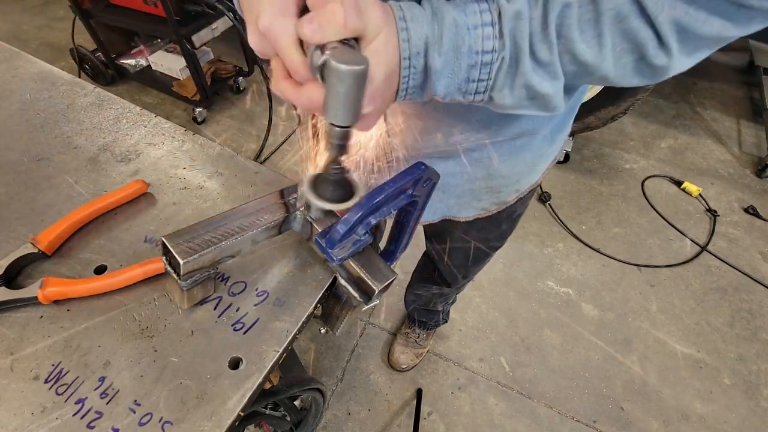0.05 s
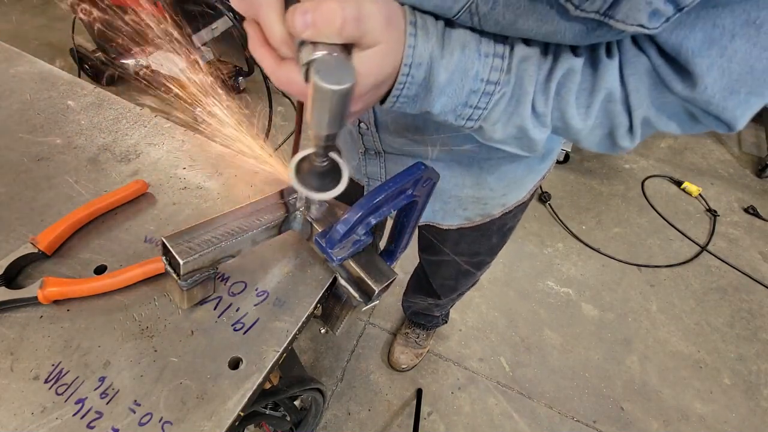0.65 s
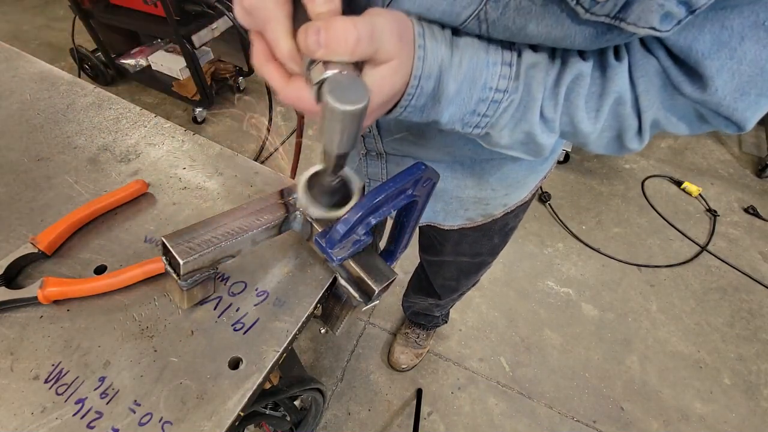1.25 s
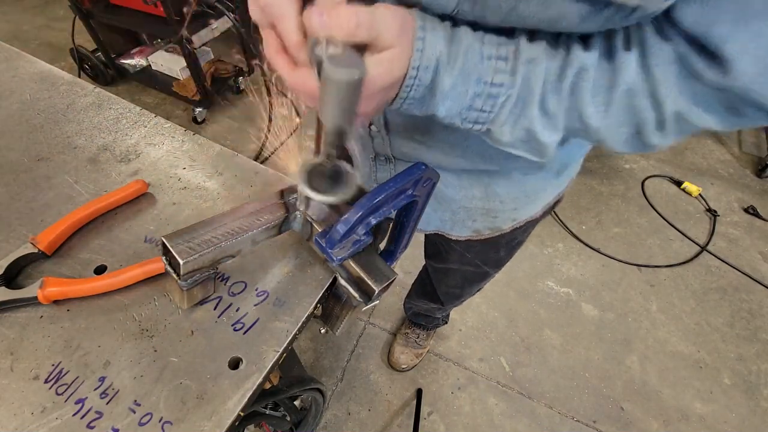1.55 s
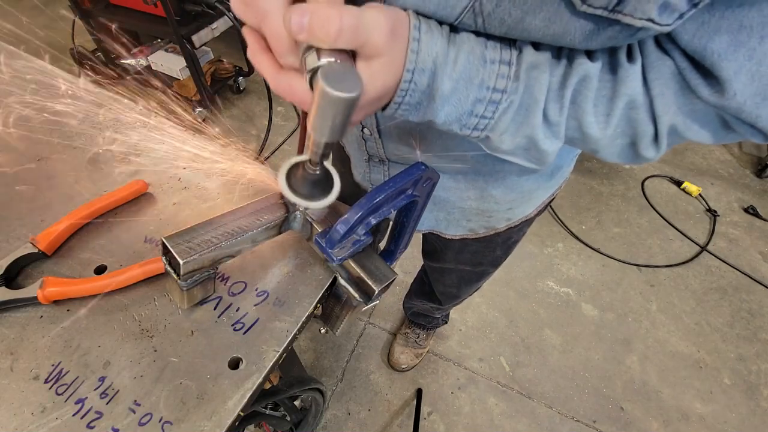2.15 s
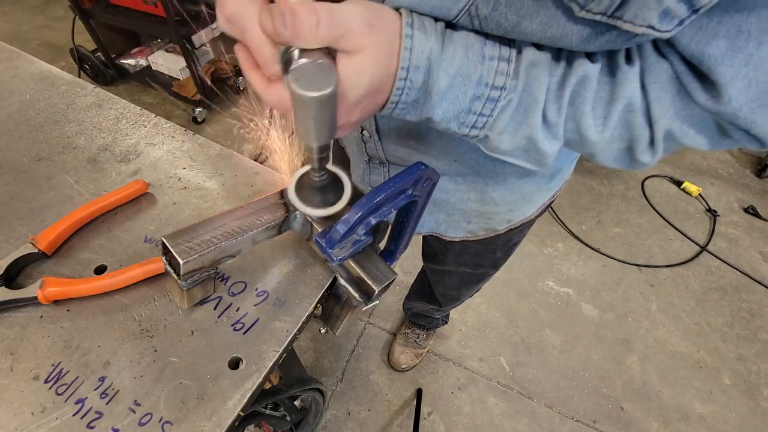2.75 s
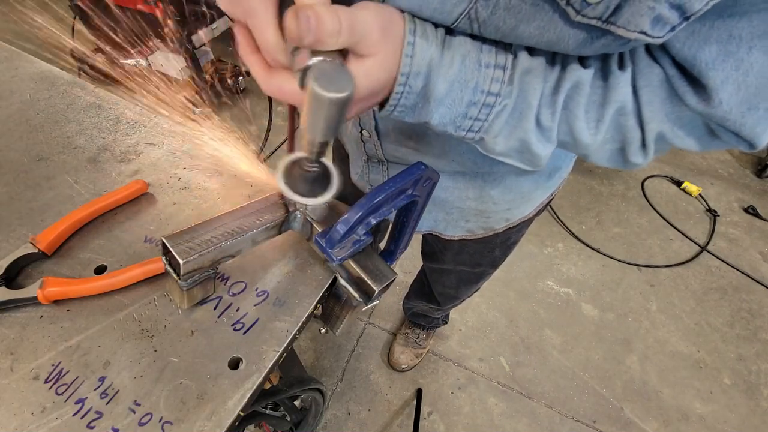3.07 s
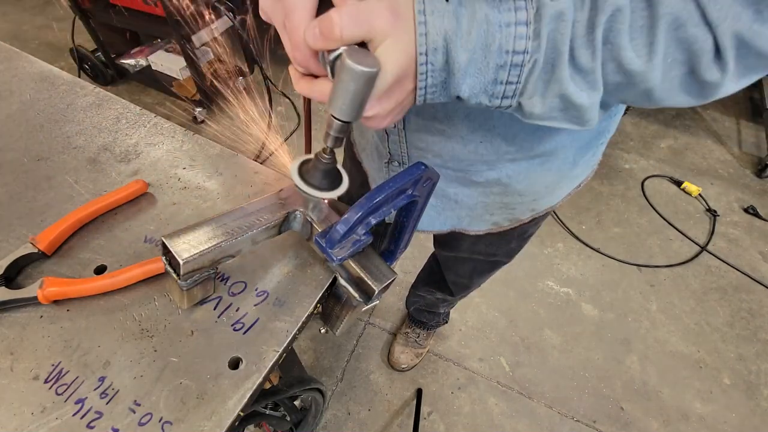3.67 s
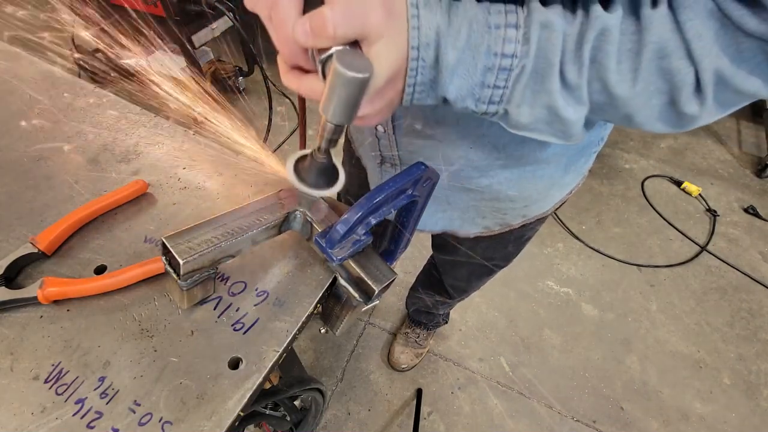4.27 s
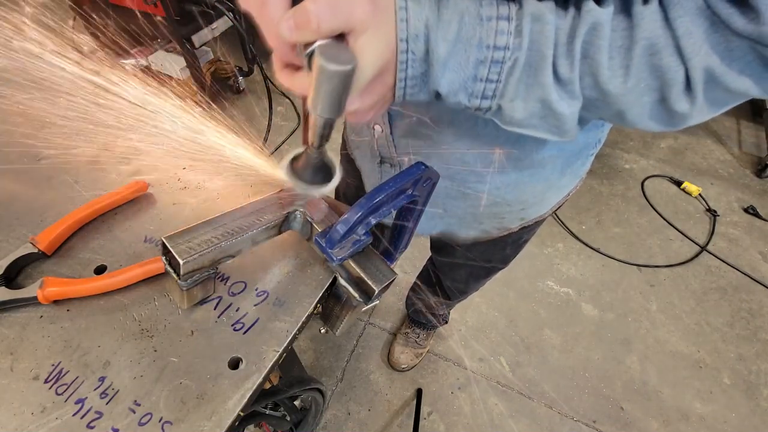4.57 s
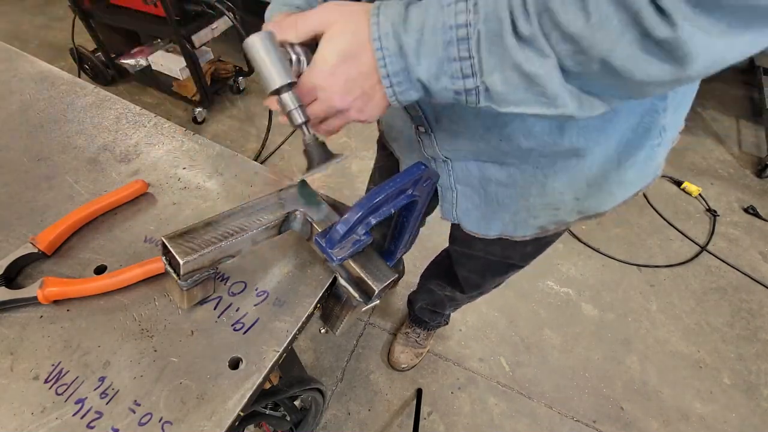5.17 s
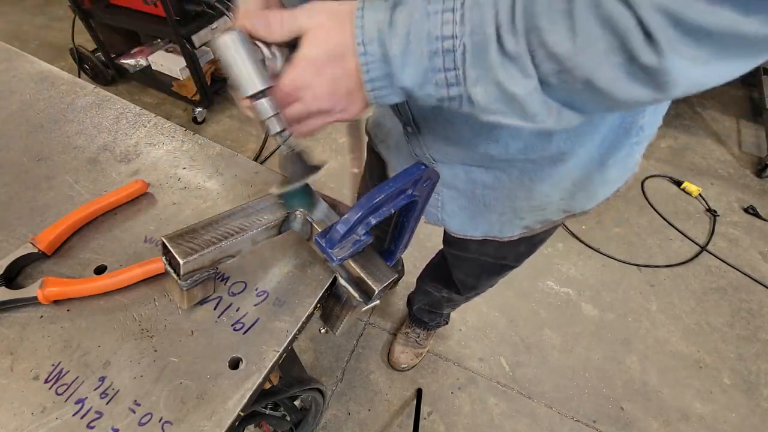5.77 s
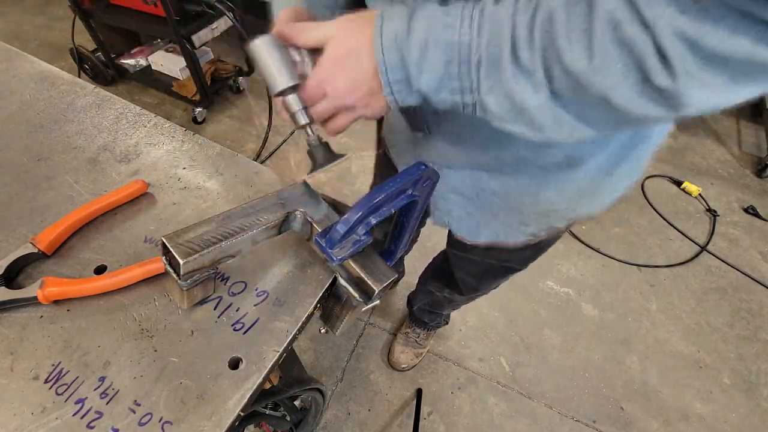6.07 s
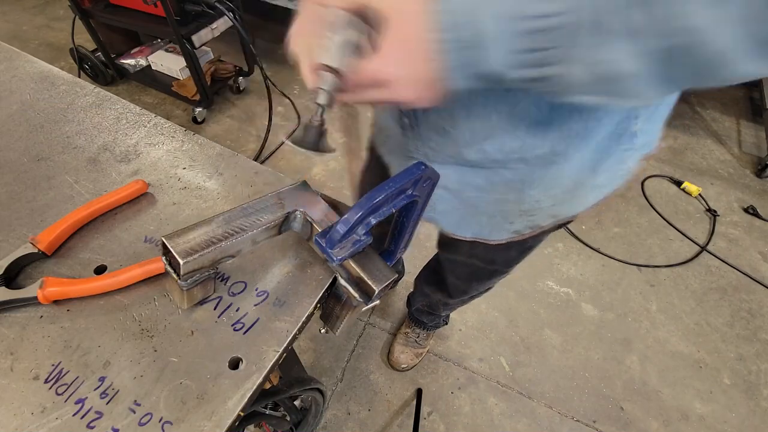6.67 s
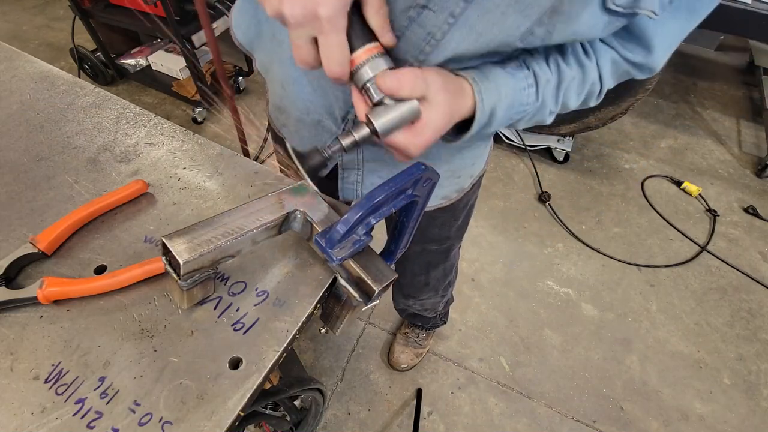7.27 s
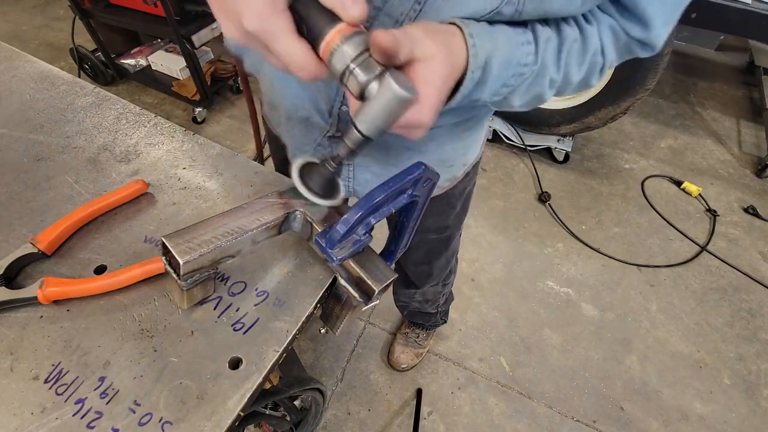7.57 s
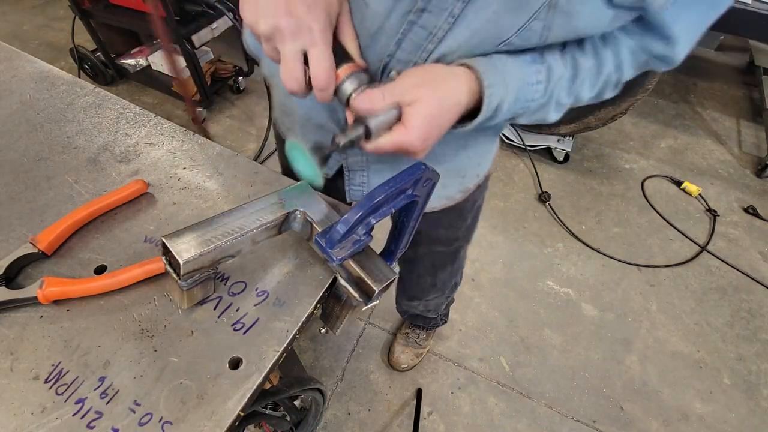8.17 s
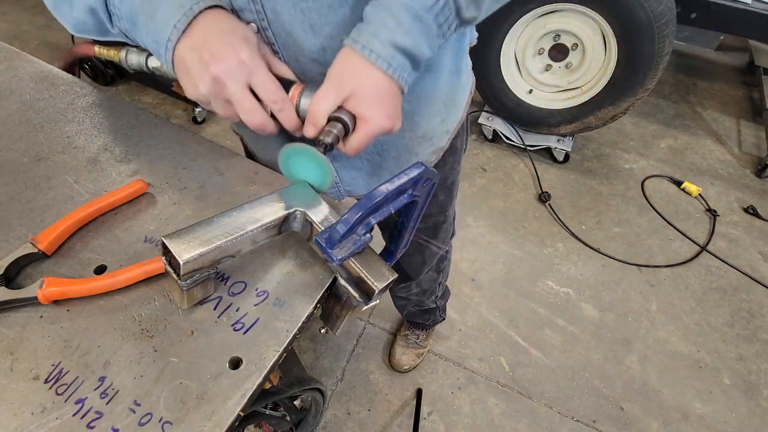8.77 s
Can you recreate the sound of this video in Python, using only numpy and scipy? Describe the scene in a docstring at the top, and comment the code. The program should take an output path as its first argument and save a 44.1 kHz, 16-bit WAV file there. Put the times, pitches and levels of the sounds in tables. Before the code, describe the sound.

An air die grinder works a welded steel tube at arm's length in a dry workshop. Bright exhaust hiss and gritty, ringing abrasion cover a wavering motor whine that sags under load and races when free. It runs from the start, with very brief breaks at about 0.2, 1.7 and 3.5 seconds, cutting back in at 3.6 with a sharp burst of hiss. The note flutters as the disc bounces, and thin high squeals come and go. After another break at 5 seconds, the pitch swings more erratically, the whine swelling near 5.6. The tool stops at about 6.7 seconds, leaving a few light clicks over a faint low room drone. It restarts at 7, breaks briefly near 7.8 and races higher until 8.2. A faint tick or two follows, then grinding resumes from about 8.5 seconds to the end, just past 9.

```python
"""A hiss of exhaust air and a wavering whine: an air die grinder dresses the weld on a steel tube in a
dry workshop, an arm's length from a phone's two microphones. The vane motor sings at four times its
shaft rate, racing when free and sagging when the disc bites. Air hisses with every pull of the trigger,
grit rings the tube, and the tool clicks lightly in the hands in the later pauses."""
import sys
import numpy as np
from scipy import signal
from scipy.fft import rfft, irfft, next_fast_len
from scipy.io import wavfile
from scipy.ndimage import uniform_filter1d

SR = 44100
rng = np.random.default_rng(int(sys.argv[2]) if len(sys.argv) > 2 else 0)


def transcribe(signal):
    """Save signal, clipped to [-1, 1], as a 16-bit WAV file at the path in sys.argv[1]."""
    frames = np.atleast_2d(signal).T
    limited = np.clip(frames, -1, 1)
    pcm = np.round(limited * 32767).astype(np.int16)
    wavfile.write(sys.argv[1], SR, pcm)


N = 398223
T = np.arange(N) / SR


def undb(db):
    """Decibels to gain."""
    return 10 ** (np.asarray(db) / 20)


def unit(x):
    """Scale to rms 1."""
    return x / np.sqrt(np.mean(x ** 2))


def curves(table):
    """The columns of a table, joined by straight lines in time."""
    s, *columns = np.transpose(table)
    return [np.interp(T, s, c) for c in columns]


def shape(x, response):
    """Filter by a response given as a function of frequency."""
    size = next_fast_len(N + 4096, True)
    freq = np.maximum(np.arange(size // 2 + 1) * SR / size, 1)
    return irfft(rfft(x, size) * response(freq), size)[..., :N]


def colour(x, hz, db):
    """Filter by a spectrum of a few points."""
    return shape(x, lambda f: undb(np.interp(np.log(f), np.log(hz), db)))


def resonance(f, hz, width):
    """Response of one mode, gain 1 at its centre."""
    return 1 / (1 + 1j * (f / hz - hz / f) * hz / width)


def walk(rate, t=T):
    """A random curve with `rate` knots a second and a spread near 1."""
    knots = rng.standard_normal(16384)
    return 1.2 * np.interp(t * rate, np.arange(len(knots)), knots)


def phase(hz):
    """Phase in radians of a moving frequency."""
    return 2 * np.pi * np.cumsum(hz) / SR


def since(s):
    """Seconds elapsed since a moment, zero before it."""
    return np.maximum(T - s, 0)


def window(start, end, fade):
    """A stretch of time: its samples, their times, and a gain ramped at both ends."""
    span = slice(int(max(start, 0) * SR), int(max(end, start + fade) * SR))
    return span, T[span], np.clip(np.minimum(T[span] - start, end - T[span]) / fade, 0, 1)


def mics(x, lag_samples=7):
    """Direct sound reaches the left microphone first."""
    return np.array([x, np.pad(x, (lag_samples, 0))[:N]])


def reflections(x, t60, delay):
    """A short diffuse tail, different at each microphone."""
    t = T[:SR // 2]
    tail = rng.standard_normal((2, len(t))) * undb(-60 * t / t60) * (t > delay)
    tail /= np.sqrt(np.sum(tail ** 2, axis=1, keepdims=True))
    return signal.fftconvolve(np.atleast_2d(x), tail, axes=1)[:, :N]


KICK_SHARE = .55  # the rotor starts this far into the rise of the air
LOADED_HZ, LOOSE_HZ = 170, 135.56  # the shaft races above the first; vanes rattle below the second
# shaft speed as the disc bites and frees, one curve a run: t/s, f/Hz
SHAFT_SPEEDS = [
    [(0, 196.4), (.04, 157.9), (.1, 215), (.17, 176.5), (.21, 280)],
    [(.35, 254), (.43, 138.1), (.56, 130.3), (.6, 186.4), (.67, 188), (.75, 140.8), (.89, 174), (1, 143.6),
     (1.13, 179.4), (1.21, 134.5), (1.39, 176.7), (1.6, 151.3), (1.63, 280)],
    [(1.85, 290), (1.95, 168.9), (2.55, 165.6), (2.7, 136.5), (2.92, 166.4), (3.03, 150.4), (3.12, 164.5),
     (3.18, 237.6), (3.24, 186.3), (3.37, 159.3), (3.44, 188.5), (3.465, 259)],
    [(3.58, 318), (3.63, 213), (3.71, 168.5), (3.78, 194.7), (3.865, 144.2), (3.9, 259.5), (4.04, 213.7),
     (4.3, 178.2), (4.6, 174), (4.71, 193.5), (4.84, 156), (5.01, 240.7)],
    [(5.19, 195), (5.32, 226.3), (5.38, 165), (5.54, 235.2), (5.63, 258), (5.69, 166), (5.735, 128),
     (5.78, 163.3), (5.84, 128.5), (5.88, 64), (5.94, 95.6), (5.98, 195), (6.03, 145.5), (6.13, 214.3)],
    [(6.23, 194), (6.27, 80), (6.305, 290), (6.345, 181.6), (6.39, 285), (6.425, 125), (6.47, 273.3),
     (6.51, 170.8), (6.56, 212), (6.68, 143.1)],
    [(7.05, 230), (7.12, 295), (7.17, 171.7), (7.21, 147.8), (7.235, 68.5), (7.28, 215), (7.32, 251),
     (7.365, 145.2), (7.45, 99.5), (7.53, 198.7), (7.63, 135), (7.69, 129.2), (7.72, 70.2), (7.74, 219.6)],
    [(7.85, 242.6), (7.98, 326.5), (8.07, 260), (8.15, 245)],
    [(8.54, 293.6), (8.66, 210.9), (8.75, 290), (8.87, 160), (8.92, 279.5), (8.98, 249.6), (9.03, 263)],
]
# runs of the tool: start t/s, release t/s, rise/s, air/dB, relative rush/dB, relative sizzle/dB,
# jet left minus right/dB, vane tone/dB, relative disc contact/dB, snag/share of speed, thump/dB, burst/dB
# at 3.563 s the grinding cuts in abruptly with a sharp burst of hiss; the other runs are trigger pulls
RUNS = [(-.2, 0.217, .03, -37, -8.5, -0.5, -1.5, -41.5, -11.5, 0.031, -45, -45),
        (0.274, 1.635, 0.028, -36, -13, 0, -2, -41, -12.5, 0.0095, -44, -49),
        (1.759, 3.467, 0.034, -36, -14, -1.5, -2.5, -39, -14, .013, -41, -38),
        (3.563, 5.022, .003, -37, -13, -0.5, -1, -40, -10, 0.031, -55, -28),
        (5.136, 6.136, 0.033, -37, -19, -1.5, -3.3, -47.5, -9.5, 0.02, -37, -39),
        (6.159, 6.691, .055, -39, -14.5, -0.5, -3, -48, -7, 0.049, -47, -57),
        (6.989, 7.741, .04, -37.5, -11.5, -0.5, 0, -45.5, -10, .045, -35.5, -37),
        (7.782, 8.151, .036, -36.5, -12, -1.5, 0.5, -42.5, -10.5, 0.026, -37.5, -51),
        (8.444, 9.2, .036, -39.5, -15, -2, 0, -45.5, -12, 0.0136, -38, -52)]
def trigger(spin_up_s=.017, coast_s=.04, tone_rise_s=.016, tone_hold_s=.011):
    """In each run the air rises and the rotor spins up; on release the air dies and the rotor coasts."""
    shut_db_per_s, drain_db_per_s, fade_db_per_s = 590, 329, 330
    flow, voice, shaft_hz = np.full((3, N), 1e-6)
    for (start, release, rise, *_), speed in zip(RUNS, SHAFT_SPEEDS):
        running, released = since(start + KICK_SHARE * rise), since(release)
        onset = np.minimum(since(start) / rise, 1) ** 2
        # the valve shuts fast; the air left in the tool drains more slowly
        air = np.maximum(undb(-shut_db_per_s * released), undb(-6.5 - drain_db_per_s * released))
        flow = np.maximum(flow, onset * air)
        forming = 1 - np.exp(-running / tone_rise_s)
        voice = np.maximum(voice, forming * undb(-fade_db_per_s * since(release + tone_hold_s)))
        spin = (1 - np.exp(-running / spin_up_s)) * np.exp(-released / coast_s)
        shaft_hz = np.maximum(shaft_hz, spin * curves(speed)[0])
    return 20 * np.log10(flow), 20 * np.log10(voice), shaft_hz


def grip():
    """The way the tool is held stays the same until the next run starts."""
    rows = np.array(RUNS)
    return rows[np.searchsorted(rows[1:, 0], T), 3:-2].T


# hands and sleeve shading the jet from the microphones: t/s, air/dB, top sizzle/dB, low rush/dB
SHADE = [(0, -0.5, 0.5, -1), (1.5, -1.06, 0, 0.5), (2.9, 1, 0, 0.5), (3.2, 0, 1.5, 0.5),
         (4.2, -0.5, -0.5, 1), (4.8, 0.5, -1.5, -0.5), (5.25, -1, 1.5, 6), (5.68, 0, 3, 3.5),
         (6.4, -0.5, 1.5, 2), (7.05, -1, 0, 1), (7.3, -2.5, 2, 2), (7.55, 1, -0.5, -5.5),
         (7.85, -1, 1, -0.5), (8.1, -2.5, -.5, 1), (8.5, 4, -2, 3.5), (8.63, 0, 3.5, -0.5),
         (8.79, -0.5, -2, 0.5), (9, 0.5, 0, 2.5)]
def airflow(flow_db, shaft_hz, air_db, rush_db, sizzle_db, db_per_octave=2):
    """A faster rotor passes more air; the jet dulls as its pressure falls."""
    shade_db, shade_top_db, shade_low_db = curves(SHADE)
    speed_db = db_per_octave * np.log2(np.maximum(shaft_hz / LOADED_HZ, .5))
    slack_db = np.minimum(-flow_db, 23)
    return (air_db + flow_db + shade_db + speed_db,
            rush_db + shade_low_db + .41 * slack_db,
            sizzle_db + shade_top_db - .31 * slack_db)


# exhaust spectrum at the microphones, an arm's length off: f/Hz, left level/dB, right level/dB
JET_SPECTRUM = [(60, -15.5, -18), (252, -11.5, -16.5), (1000, -15.5, -12.5), (1640, -11.5, -11.5),
                (2420, -11.5, -17), (3170, -1, -7.5), (4430, 2.5, 3), (5100, 4, 2.5), (7580, 7, 3.5),
                (8400, 4.5, -30), (11200, 0, -16), (12600, 2.3, -3.5), (14200, 1, -7), (15700, -2, -10.5)]
def exhaust(shaft, air_db, rush_db, sizzle_db):
    """A turbulent jet throbs with the vanes: low rush, hissing core and top sizzle."""
    throb = 1 + .2 * np.sin(4 * shaft) + .05 * np.sin(shaft)
    direct = mics(rng.standard_normal(N))
    scattered = colour(rng.standard_normal((2, N)), hz=[300, 1000, 2500, 12000], db=[-14.5, -17, 3.5, 8.5])
    left, right = direct + scattered
    hz, left_db, right_db = np.transpose(JET_SPECTRUM)
    jet = np.array([colour(left, hz, left_db), colour(right, hz, right_db)]) * throb
    rush = shape(jet, lambda f: 1 / (1 + (f / 2800) ** 6))
    sizzle = shape(jet, lambda f: 1 / (1 + (9500 / f) ** 12))
    core = jet - rush - sizzle
    jet = unit(core) + undb(rush_db + 6.5) * unit(rush) + undb(sizzle_db + 4) * unit(sizzle)
    return jet * undb(air_db + .5 * walk(70))


def swirl(x, depth_db, size=512):
    """The colour of the hiss drifts in soft patches, about 0.1 s long and a kilohertz wide."""
    spectra = signal.stft(x, nperseg=size)[2]
    bands = uniform_filter1d(rng.standard_normal(spectra.shape[1:]), size=9, axis=0)
    patches = unit(uniform_filter1d(bands, size=20, axis=1))
    return signal.istft(spectra * undb(depth_db * patches), nperseg=size)[1][:, :N]


def rotor(shaft_hz, brake, snag):
    """Shaft angle and tone level: snags, rattling slow vanes and racing make the speed uneven."""
    racing_hz = np.maximum(shaft_hz - LOADED_HZ, 0)
    rattle = .18 * np.maximum(1 - shaft_hz / LOOSE_HZ, 0)
    flutter = .0001494 * racing_hz
    jitter = (snag + rattle + flutter) * (walk(60) + walk(220))
    shaft = phase(shaft_hz * (1 - brake + jitter))
    # the note stutters as the disc catches, breaks off at random and thins when racing
    catch_db = 63 * snag * walk(35)
    dropout_db = 16.5 * np.clip(2 * (walk(80) - 1.3), 0, 1)
    return shaft, catch_db - dropout_db - .17 * racing_hz


# partials of the motor: multiple of the shaft rate, level/dB
MOTOR_HARMONICS = [(1, -18.5), (2, -16), (3, -20), (4, 3), (5, -45), (6, -25), (7, -21), (8, -16.5),
                   (12, -23)]
# resonances of the tool body: f/Hz, level/dB
BODY_SPECTRUM = [(40, -18), (135, 4.5), (205, -8.5), (270, 1), (350, 3.5), (440, -4), (520, 2.5), (600, -3),
                 (1200, 2), (4000, -12)]
# swells and dips in the loudness of the motor's whine: t/s, level/dB
WHINE_SWELLS = [(.35, -0.5), (.52, 2.5), (1.35, 2.5), (1.63, -1), (1.8, 3), (2.1, -2), (3.4, 0),
                (3.86, -3.5), (3.95, -9), (4.05, 1), (4.6, -4), (5.3, 2.5), (5.58, 12), (5.72, 2.5),
                (5.9, 2), (7.32, 0.5), (7.65, 2), (8, 3), (8.1, -5.5), (8.55, 5.5), (8.8, -3.5), (9, 1.5)]
def motor(shaft, tone_db):
    """Four vanes puff once each per turn; small differences between them add the lower harmonics."""
    tone = sum(undb(db) * np.sin(k * shaft + rng.uniform(0, 2 * np.pi)) for k, db in MOTOR_HARMONICS)
    swell_db, = curves(WHINE_SWELLS)
    chatter_db = 1.5 * walk(55) + 1.4 * walk(260)  # the disc chatters
    tone = colour(tone * undb(tone_db + swell_db + chatter_db + 2.5), *np.transpose(BODY_SPECTRUM))
    # the bench sends back a late copy that beats against the gliding pitch
    tone = tone + .12 * np.interp(T - .011, T, tone)
    near = reflections(tone, t60=.12, delay=.003)
    return mics(tone + undb(-10) * near[0]) * undb([[.7], [-.7]]) + undb(-26) * near


# modes of the steel tube clamped at the bench: f/Hz, width/Hz, level/dB
TUBE_MODES = [(2290, 60, -45), (3160, 180, -18), (3580, 190, 4), (5276, 670, 9.5), (6030, 240, -0.5),
              (7300, 130, -15), (9240, 260, 2), (12600, 400, -10), (12800, 120, -1), (14200, 160, -2)]
def grinding(shaft, grit_db, strikes_per_s=7000):
    """Grit strikes the weld, hardest once a turn where the disc runs high, and rings the tube."""
    strikes = (rng.random(N) < strikes_per_s / SR) * rng.standard_normal(N)
    force_db = 1.6 * np.minimum(rng.exponential(size=N), 5) + 2.1 * np.sin(shaft)
    grit = unit(strikes * undb(force_db)) * undb(grit_db)
    ring = shape(grit, lambda f: sum(undb(db) * resonance(f, hz, width) for hz, width, db in TUBE_MODES))
    tube = mics(ring) + reflections(ring, t60=.036, delay=.00031)
    return undb(10) * tube + mics(grit) * undb([[-15], [-21]])


def kicks():
    """A run sets in with a burst of hiss and a low thump, on a trigger pull the first slow vane puffs."""
    thumps, bursts, t = np.zeros(N), np.zeros(N), T[:SR // 8]
    for start, _, rise, *_, thump_db, burst_db in RUNS:
        first = int((start + KICK_SHARE * rise) * SR)
        if first < 0:
            continue
        span = slice(first, first + len(t))
        chirp = np.sin(2 * np.pi * (90 * t + 7000 * t ** 2))
        rumble = 3 * uniform_filter1d(rng.standard_normal(len(t)), size=40)
        thump = (chirp + rumble) * (1 - np.exp(-t / .009)) * np.exp(-t / .01)
        thumps[span] += undb(thump_db) * thump / np.abs(thump).max()
        bursts[span] += undb(burst_db) * rng.standard_normal(len(t)) * np.exp(-t / .013)
    return mics(thumps + colour(bursts, hz=[500, 2000, 5000, 15000], db=[-4, -15, -1, -8]))


# tube and disc singing out, left of centre: start t/s, end t/s, f/Hz, width/Hz, level/dB
SQUEALS = [(0.344, 1.597, 10200, 100, -47), (0.349, 1.6, 6800, 1200, -40), (1.9, 3.45, 10100, 99.2, -45.5),
           (1.9, 3.304, 13700, 129, -52), (3.95, 4.6, 5330, 260, -50.5), (5.3, 5.032, 5285, 220, -45),
           (4.787, 4.89, 5270, 150, -37), (7.054, 8.15, 4199, 835, -51), (5.247, 6.68, 4400, 1200, -45),
           (5.349, 5.85, 5110, 430, -45.5), (5.25, 6.15, 11000, 80, -54), (5.25, 6.148, 15000, 70, -50),
           (5.25, 6.147, 15350, 60.07, -47), (5.253, 6.6, 15600, 65, -56), (7.448, 7.697, 5350, 400, -43),
           (8.458, 8.629, 3260, 1204, -45), (8.602, 9.1, 3400, 700, -48)]
def squeals():
    """Narrow resonances fed by the random rubbing of the disc."""
    out = np.zeros(N)
    for start, end, hz, width, db in SQUEALS:
        span, t, gain = window(start, end, fade=.036)
        ring = signal.lfilter(*signal.iirpeak(hz, hz / width, fs=SR), rng.standard_normal(len(t)))
        out[span] += undb(db) * unit(ring) * gain
    return mics(out) * undb([[1], [-4]])


# the disc bouncing on the weld: first bite t/s, end t/s, rate/Hz, swing/share of speed
BOUNCES = [(0.718, 1.354, 12.5, 0.017), (1.428, 1.61, 16.1, .07), (2.012, 2.622, 14.8, 0.056),
           (2.695, 3.079, 15, 0.074), (4.191, 4.92, 15.5, .075)]
def bouncing():
    """Each bounce presses the disc in and brakes the motor; the note breaks while the speed jumps."""
    brake, break_db = np.zeros((2, N))
    for start, end, hz, swing in BOUNCES:
        span, t, gain = window(start - .5 / hz, end, fade=.0251)
        bite = np.tanh(1.83 * np.cos(2 * np.pi * hz * (t - start) + .26 * walk(5, t)))
        brake[span] += swing * gain * bite
        break_db[span] += 65 * swing * gain * (bite ** 2 - .65)
    return brake, break_db


# brief low hums of the spinning tool: start t/s, end t/s, f/Hz, level/dB
HUMS = [(2.67, 2.737, 441, -39), (5.256, 5.356, 354, -46), (5.252, 5.348, 200, -50),
        (5.513, 5.565, 215, -45), (5.583, 5.647, 203, -39.5), (8.081, 8.165, 201, -44),
        (8.677, 8.727, 360, -44.5), (8.822, 9.023, 590, -51.5), (8.88, 9.027, 199.7, -51.5)]
def hums():
    """The unbalanced disc gives wavering hums, near the shaft rate or twice that."""
    out = np.zeros(N)
    for start, end, hz, db in HUMS:
        span, t, gain = window(start, end, fade=.033)
        out[span] += gain * undb(db + 2 * walk(60, t)) * np.sin(phase(hz + 14 * walk(80, t)))
    return mics(out)


# room tone of the workshop: f/Hz, level/dB
ROOM_SPECTRUM = [(25, -6.5), (50, 6), (75, -4.5), (130, -11.5), (260, -5), (340, -4), (430, -23.5),
                 (520, -12), (750, -33), (2000, -40), (6000, -51), (15000, -61)]
# its rise from near silence: t/s, level/dB
ROOM_LEVEL = [(0, -88), (3.5, -90), (3.65, -56), (6.9, -58), (9.0, -56.5)]
def room_tone():
    """Low drone of the workshop, nearly the same at both microphones."""
    level_db, = curves(ROOM_LEVEL)
    noise = rng.standard_normal(N) + .2 * rng.standard_normal((2, N))
    return unit(colour(noise, *np.transpose(ROOM_SPECTRUM))) * undb(level_db + .48 * walk(6.7))


# air whistling in the valve, left of centre: start t/s, end t/s, start f/Hz, end f/Hz, level/dB
WHISTLES = [(5.165, 5.25, 9500, 9000, -33), (7.967, 8.07, 8700, 10800, -32),
            (8.49, 8.59, 11200, 13200, -38)]
def whistles():
    """Airy whistles of the valve that glide in pitch."""
    out = np.zeros(N)
    for start, end, from_hz, to_hz, db in WHISTLES:
        span, t, gain = window(start, end, fade=.018)
        hz = np.interp(t, [start, end], [from_hz, to_hz]) + 260 * walk(1500, t)
        out[span] += gain * undb(db + 3.7 * walk(300, t)) * np.sin(phase(hz))
    return mics(out) * undb([[2], [-3]])


# the tool clicking in the hands, an arm's length off: t/s, level/dB, f/Hz
CLICKS = [(6.8195, -48.5, 8200), (6.836, -70, 8480), (6.8548, -58, 4950), (6.864, -49, 4760),
          (6.909, -66, 10980), (6.9261, -52, 5020), (6.951, -59, 7010), (6.957, -54, 6320),
          (6.971, -50.5, 8520), (8.3486, -72, 3500), (8.4131, -61, 6010)]
def clicks(knock_hz=1400):
    """Small dry ticks of the trigger and hose coupling, each with a dull knock of the housing."""
    out, t = np.zeros(N), T[:SR // 25]
    for s, db, hz in CLICKS:
        snap = rng.standard_normal(len(t)) * (np.exp(-t / .0011) + .25 * np.exp(-t / .017))
        tick = signal.lfilter(*signal.iirpeak(hz, Q=1, fs=SR), snap)
        bump = rng.standard_normal(len(t)) * np.exp(-t / .0074)
        knock = signal.lfilter(*signal.iirpeak(knock_hz, Q=.7, fs=SR), bump)
        span = slice(int(s * SR), int(s * SR) + len(t))
        out[span] += undb(db) * tick / np.abs(tick).max() + undb(-61) * knock / np.abs(knock).max()
    out = colour(out, hz=[9500, 14000], db=[0, -14])
    return mics(out) + undb(-12) * reflections(out, t60=.14, delay=.002)


def scene():
    """Shaft speed and air flow drive the tool at the bench; the workshop answers faintly."""
    flow_db, voice_db, shaft_hz = trigger()
    air_db, rush_db, sizzle_db, aim_db, tone_db, contact_db, snag = grip()
    air_db, rush_db, sizzle_db = airflow(flow_db, shaft_hz, air_db, rush_db, sizzle_db)
    brake, break_db = bouncing()
    shaft, rotor_db = rotor(shaft_hz, brake, snag)
    jet = exhaust(shaft, air_db, rush_db, sizzle_db) * undb([aim_db / 2, -aim_db / 2])
    hiss = swirl(jet + grinding(shaft, air_db + contact_db), depth_db=1.46)
    # the steel bench adds a fine, steady ripple to the spectrum of the hiss
    hiss = hiss + undb(-12) * reflections(hiss, t60=.045, delay=.0012)
    whine = motor(shaft, tone_db + voice_db + break_db + rotor_db)
    tool = hiss + whine + kicks() + squeals() + hums() + whistles()
    # the far walls give back little treble
    walls = signal.lfilter(*signal.butter(2, 7000, fs=SR), reflections(tool, t60=.27, delay=.0027))
    return tool + undb(-19.5) * walls + room_tone() + clicks()


def record(dry):
    """The phone thins the deepest bass and cuts the top."""
    bass_hz, top_hz = 38, 15700
    thinned = signal.sosfilt(signal.butter(2, bass_hz, "high", fs=SR, output="sos"), dry)
    return signal.sosfilt(signal.ellip(10, .2, 75, top_hz, fs=SR, output="sos"), thinned)


dry = scene()
out = record(dry)
transcribe(out)
```